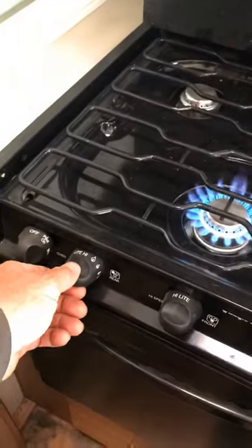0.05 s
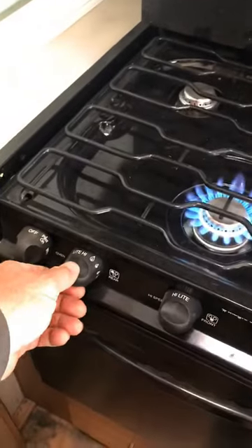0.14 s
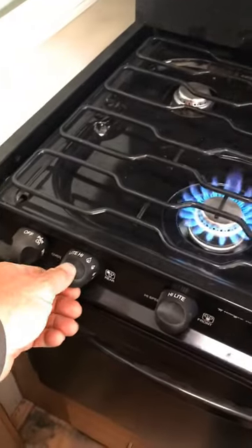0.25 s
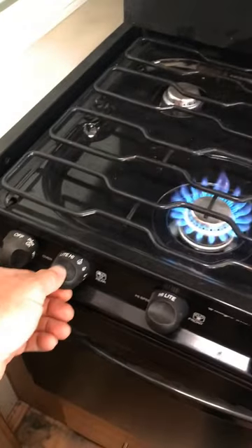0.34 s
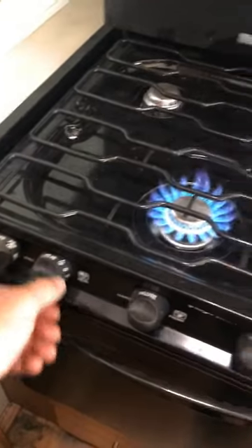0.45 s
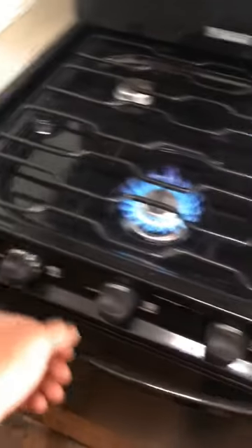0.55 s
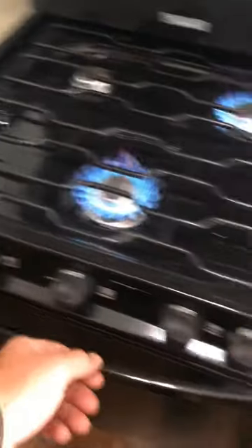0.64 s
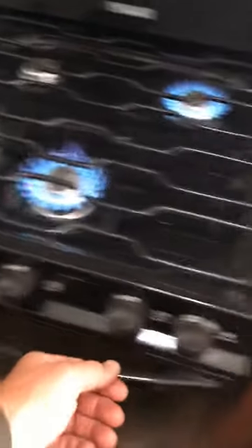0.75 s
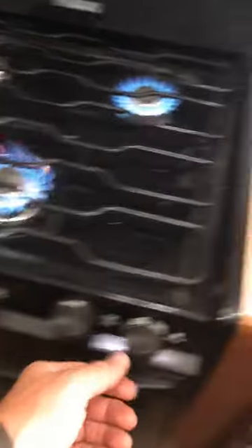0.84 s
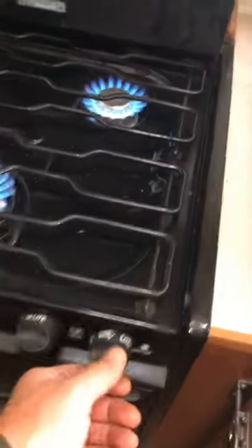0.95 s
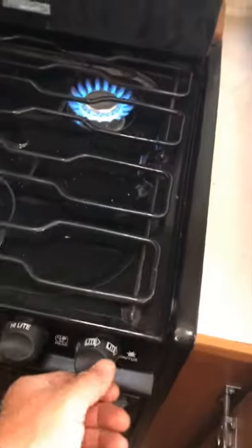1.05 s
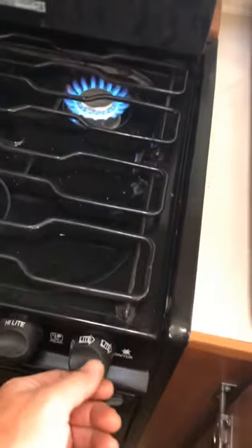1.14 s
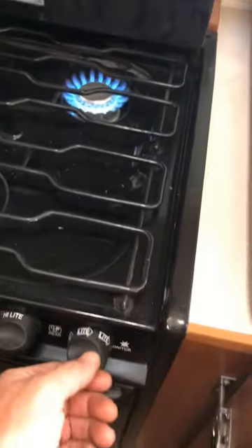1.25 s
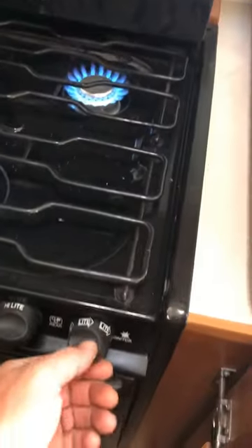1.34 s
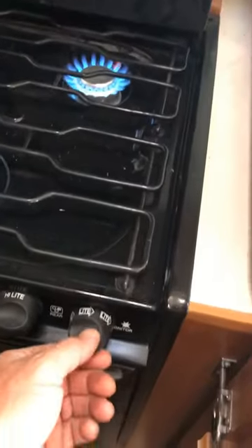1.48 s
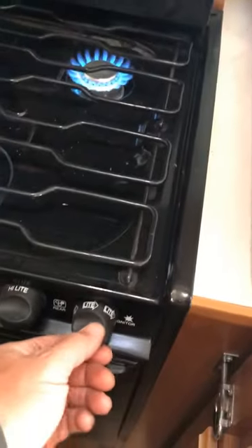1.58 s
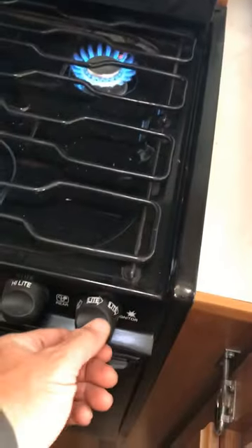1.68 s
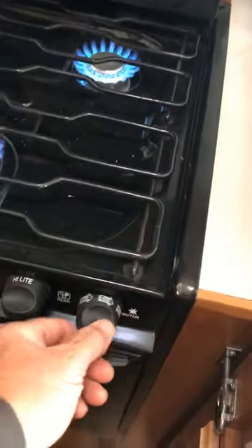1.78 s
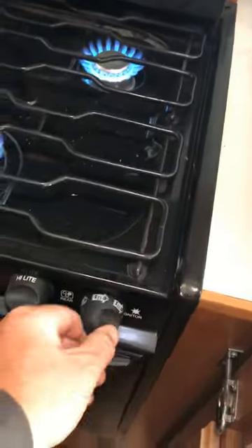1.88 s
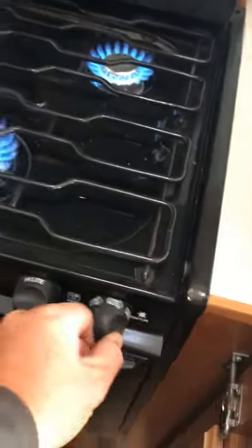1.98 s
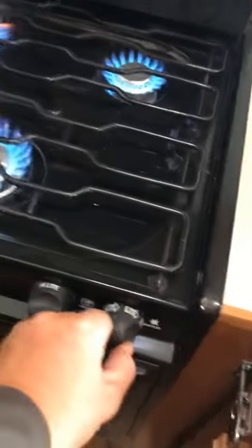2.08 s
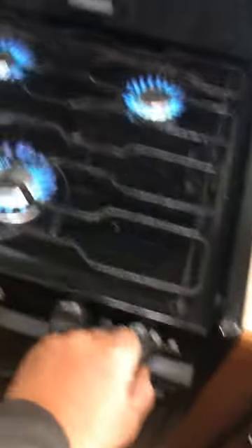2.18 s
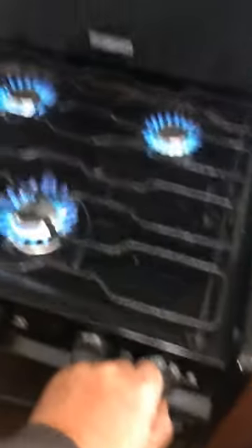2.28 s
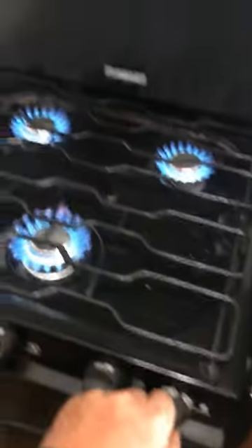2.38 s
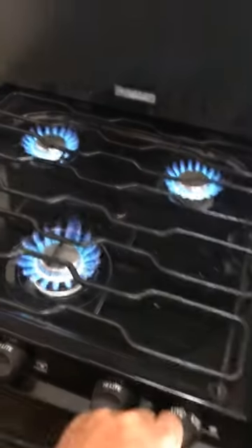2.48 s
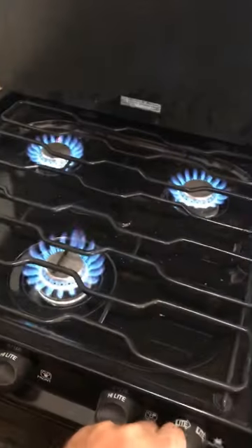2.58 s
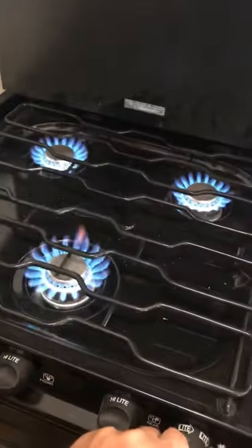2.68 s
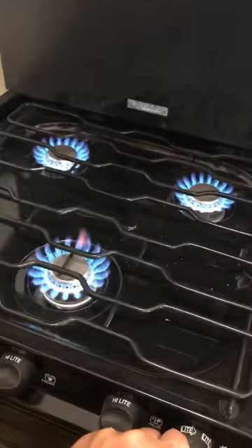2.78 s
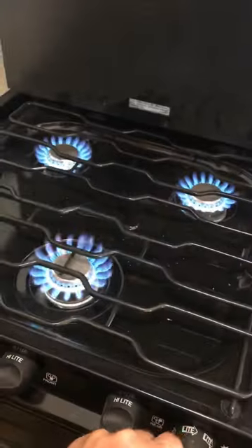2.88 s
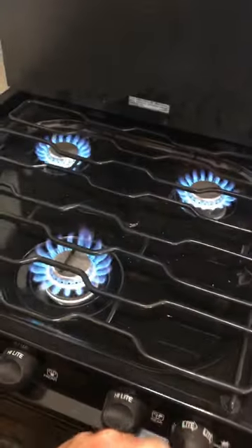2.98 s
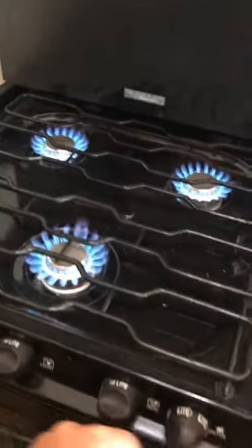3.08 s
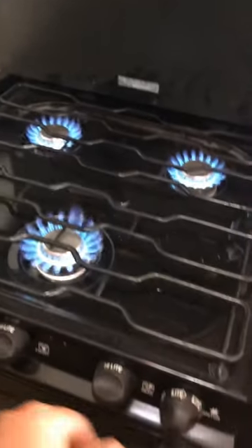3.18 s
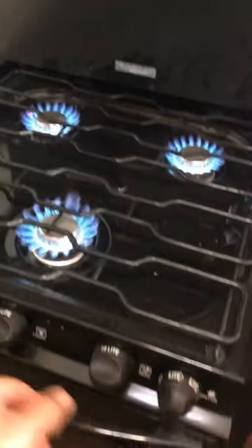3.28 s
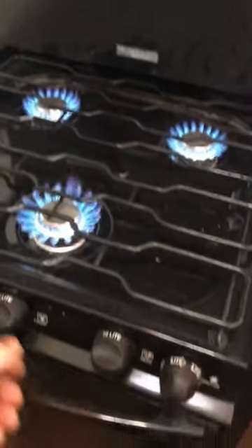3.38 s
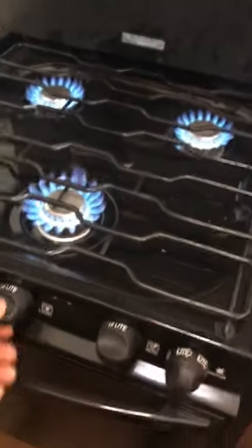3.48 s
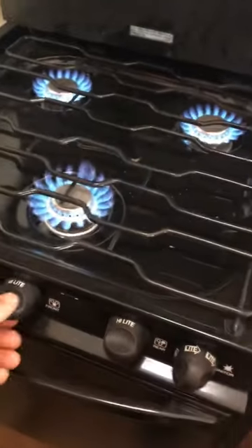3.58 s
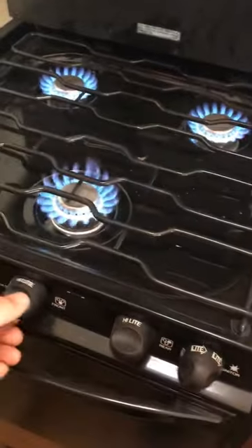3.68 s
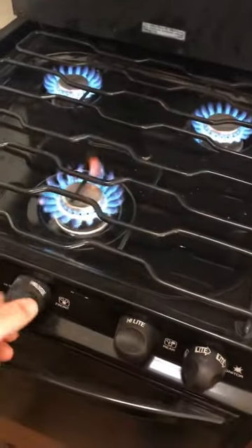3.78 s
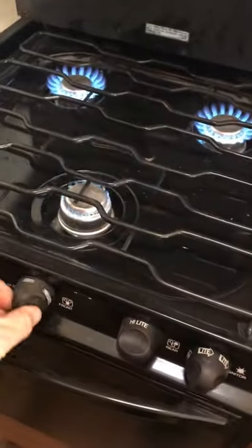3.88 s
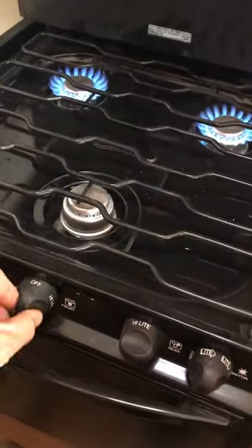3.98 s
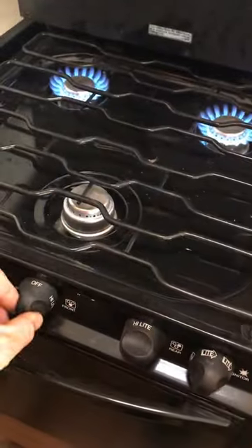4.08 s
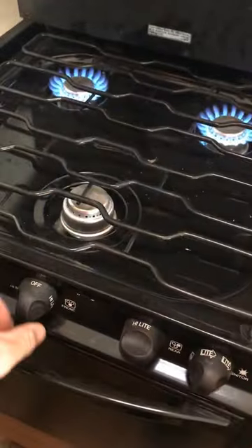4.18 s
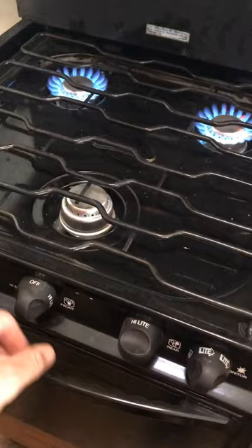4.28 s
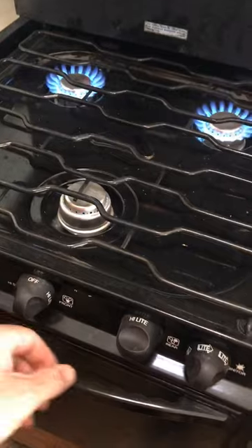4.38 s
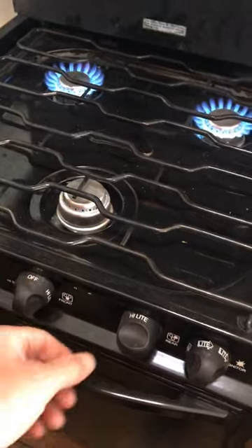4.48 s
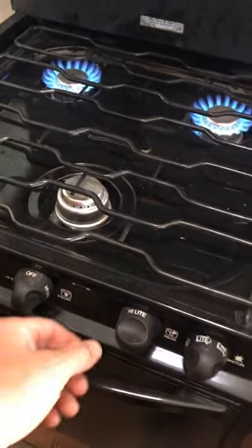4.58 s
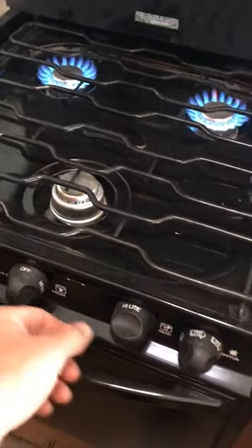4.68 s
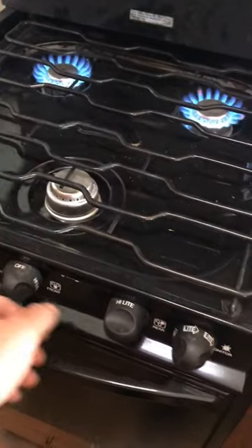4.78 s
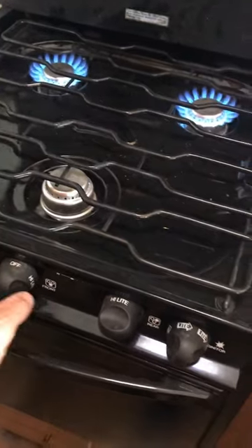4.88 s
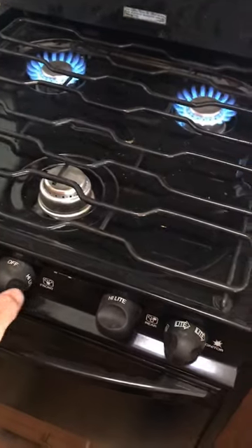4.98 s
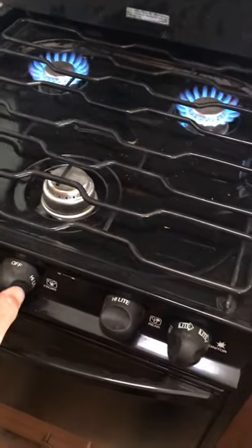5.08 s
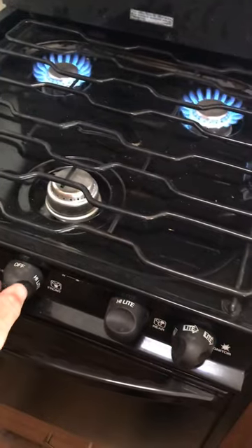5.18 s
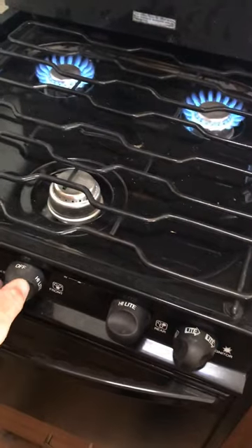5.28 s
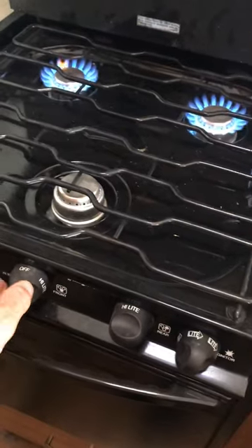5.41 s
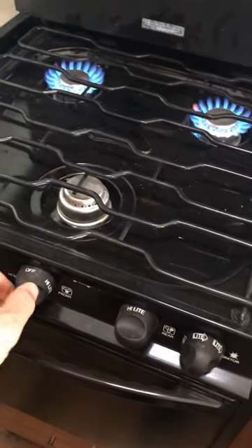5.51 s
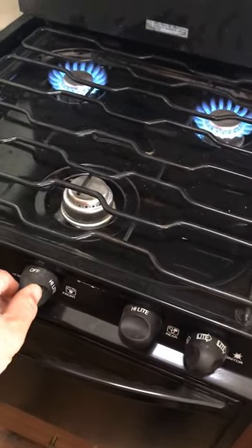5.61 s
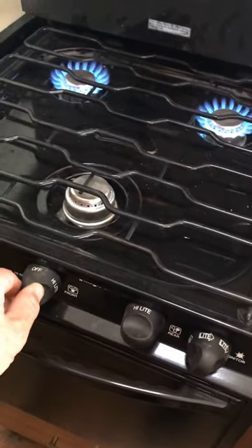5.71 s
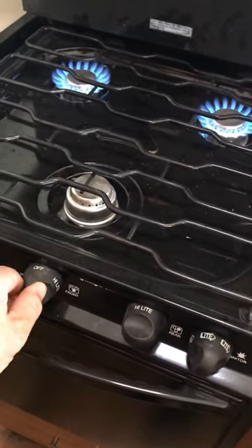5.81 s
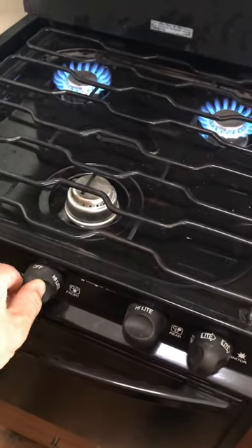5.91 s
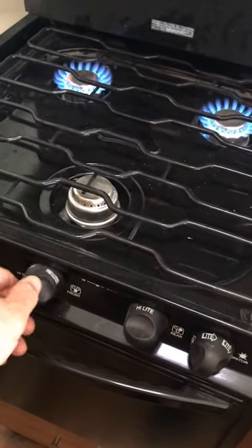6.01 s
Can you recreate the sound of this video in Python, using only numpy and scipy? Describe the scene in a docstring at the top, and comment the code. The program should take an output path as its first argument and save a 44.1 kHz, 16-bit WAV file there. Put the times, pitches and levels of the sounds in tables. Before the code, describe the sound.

A gas range murmurs and hisses softly as fingers tick its knobs, two loud igniter snaps clang through the metal, then a burner clicks off.

```python
"""Gas range, close up

Recorded in a kitchen with one microphone above a small range: filtered noise makes the burners' murmur,
hiss and faint whistle. Fingers rub and tick the knobs, and one burner is shut off with a sharp click.
A hand turns the rotary spark igniter: its shaft grinds, and its spring hammer snaps twice. Noise and
decaying modes ring the sheet-steel top, the wire grate and the spring; a burner catches with a soft puff."""
import sys
import numpy as np
from scipy import signal
from scipy.fft import rfft, irfft, next_fast_len
from scipy.io import wavfile
from scipy.ndimage import uniform_filter1d, minimum_filter1d, map_coordinates

SR = 44100
rng = np.random.default_rng(int(sys.argv[2]) if len(sys.argv) > 2 else 0)


def to_wav(s):
    """Save 16-bit WAV."""
    ch = np.atleast_2d(s).T  # columns
    pcm = np.round(np.clip(ch, -1, 1) * 32767)  # PCM
    wavfile.write(sys.argv[1], SR, pcm.astype(np.int16))


N = 266805  # samples
TOP_HZ = 16100  # band limit of everything heard

# Flame murmur. Each row: frequency in Hz, relative level in dB per Hz.
MURMUR_SPECTRUM = [(18, -38), (30, -21.5), (46, -4), (75, -2), (107, 3), (150, -7.5), (200, -16),
                   (255, -27), (400, -33), (1000, -45.5), (2200, -89.5)]
# Gas hiss. Each row: frequency in Hz, relative level in dB per Hz.
HISS_SPECTRUM = [(400, -27.5), (800, -15), (1300, -10), (2000, -14.5), (4900, -17.5), (6500, -14),
                 (9500, -15), (10500, -17.5), (12000, -13), (16000, -12.5)]
# Burner mixing tubes. Each row: frequency in Hz, width in Hz, relative level in dB.
TUBE_RESONANCES = [(548.7, 24, 2.5), (1100.8, 44, -2.5), (1313, 97, -11), (1740, 65, -10.5),
                   (2300, 60, -18.5)]
# Gas jets. Each row: frequency in Hz, width in Hz, relative level in dB.
JET_RESONANCES = [(5580, 120, -6.5), (6506, 160, -4.5), (8100, 33, -11.5), (8850, 160, -3.5),
                  (9412, 92, 3.5)]
# The hollow under the top. Each row: frequency in Hz, width in Hz, relative level in dB.
CAVITY_RESONANCES = [(303, 25, 1), (332.4, 21, -9)]
REAR_OPENS_S, BIG_CLOSES_S, VALVE_TURN_S = 0.34, 3.84, 0.2  # middle of each turn; length of a turn
MURMUR_DB, CAVITY_DB, HISS_DB, JETS_DB = -52, -72, -67, -72  # with the big burner closed
BIG_MURMUR_DB, BIG_CAVITY_DB, BIG_HISS_DB = 2.5, 8, 1.6  # what the big burner adds while open
JETS_STARVED_DB = 4  # the other jets sing less while it takes their pressure
TUBES_DB, TUBES_SHUT_DB = -67, -4.5  # with the rear valve open; the change with it shut

# Swells of the big burner's whistle. Each row: top in seconds, half length in seconds.
SWELLS = [(.35, 0.54), (3.55, 0.39)]
# The whistle's pitches. Each row: frequency in Hz, width in Hz, relative level in dB.
WHISTLE_RESONANCES = [(2268, 18, 0.0), (4403, 91, -9.0)]
WHISTLE_DB, WHISTLE_SWELL_DB = -84.5, 7.5  # steady level; the rise in a swell

# Knobs click and knock as they are pushed in or let go.
# Each row: start in seconds, level in dB, centre in Hz, t60 in seconds, stem pitch in Hz.
KNOB_CLICKS = [(2.402, -58.5, 940, .4, 940), (3.5935, -47.5, 4740, 0.072, 5300),
               (5.151, -64, 2200, 0.044, 3700), (5.1667, -52, 2800, 0.049, 3700),
               (5.881, -62.5, 2460, 0.15, 3720)]
# Fingers rub over a knob.
# Each row: start in seconds, level in dB, rise in seconds, t60 in seconds, relative panel level in dB.
KNOB_RUBS = [(.335, -66.5, 0.014, 0.27, -6), (.905, -68, 0.009, 0.66, 0), (.966, -58, 0.01, 0.11, 3.5),
             (1.06, -77, 0.08, 0.32, 9), (1.712, -59.5, 0.028, .35, -4), (3.506, -67.5, .005, 0.26, -3),
             (4.08, -63.5, 0.032, 0.24, -1.5), (5.19, -72, .01, 0.92, -4), (5.96, -67.5, 0.049, 0.64, -12)]
# Knob and stem. Each row: frequency in Hz, width in Hz, relative level in dB.
KNOB_RESONANCES = [(560, 120, -12), (1380, 300, 0), (2640, 280, -2.5), (3680, 230, -3), (5640, 803, -6),
                   (9500, 1500, -9.5)]
# Front panel under the fingers. Each row: frequency in Hz, relative level in dB per Hz.
FRONT_PANEL_SPECTRUM = [(100, 0.0), (500, -2), (1500, -5.0), (4000, -14.0), (12000, -35.5)]
CLICK_RISE_S, STEM_DB = 0.001, 5.5  # rise of every click; stem ring relative to its click
# The panel's level under a click centred at THUD_AT_HZ; duller clicks shake it more.
THUD_DB, THUD_DB_PER_OCTAVE, THUD_AT_HZ = 0, 10.5, 2520
RUB_HZ = 2806  # centre of every rub

# Crack of the shut-off. Each row: frequency in Hz, relative level in dB per Hz.
CRACK_SPECTRUM = [(150, -36.5), (550, -30), (1000, -39), (1400, -25), (1800, -19), (2650, -4), (3600, -7),
                  (5000, -8.5), (6100, -5), (7400, -9.5), (9000, 3), (10800, -10), (13400, 0.5),
                  (16000, -3)]
# Valve body. Each row: frequency in Hz, relative level in dB, t60 in seconds.
VALVE_MODES = [(1343, -11.5, 0.11), (2540, -7, 0.08), (2760, -14, 0.16), (3590, -2, 0.053),
               (3680, -13.5, 0.16), (6300, -8, 0.054), (8530, 4, 0.035), (8640, 4, 0.052), (9600, -10, .13),
               (13500, 3, 0.046)]
# The kitchen's answer. Each row: frequency in Hz, relative level in dB per Hz.
WALL_SPECTRUM = [(100, -33), (350, 11), (600, 11.0), (900, -3), (1400, 9.5), (2000, 1.5), (15000, -10)]

# The igniter's shaft under load. Each row: peak in seconds, level in dB, rise in seconds.
SHAFT_GRINDS = [(0.994, -52, 0.0092), (1.65, -58.5, 0.047), (1.815, -50.5, 0.031), (2.11, -40, 0.056)]
# Colour of the grinding. Each row: frequency in Hz, relative level in dB per Hz.
GRIND_SPECTRUM = [(80, -12), (200, 0), (550, -1.5), (900, -10), (1800, -11), (5000, -31.5), (12000, -65)]
GRIND_T60 = 0.18  # seconds

# Puff of the new flame. Each row: frequency in Hz, relative level in dB per Hz.
PUFF_SPECTRUM = [(30, -18.5), (70, -5), (115, 2), (200, -13.5), (400, -21.5), (900, -30), (4000, -67.5)]
CATCH_DELAY_S = 0.046  # from the first snap until the gas catches
PUFF_DB, PUFF_RISE_S, PUFF_HOLD_S, PUFF_T60 = -38.5, 0.034, .21, .17

# Igniter snaps. Each row: start in seconds, blow in dB, long ring in dB, spring buzz in dB,
# seconds for which the spring buzzes freely.
IGNITER_SNAPS = [(1.832, -8.5, -22.5, -39, .05), (2.125, -9.5, -21, -25, 0.27)]
# The cam's trip. Each row: frequency in Hz, relative level in dB per Hz.
TRIP_SPECTRUM = [(400, -30), (1500, 0.5), (3500, -0.5), (6000, -12.5), (16000, -19.5)]
# Clang of the steel top. Each row: frequency in Hz, relative level in dB per Hz.
CLANG_SPECTRUM = [(50, -25), (110, -8), (170, -3.5), (245, -15.5), (300, -6), (370, -14.5), (560, -5),
                  (720, -16.5), (1000, -18), (1400, -5), (2600, -5), (4500, -8.5), (9300, -9.5),
                  (10500, -14.5), (13500, -11), (16000, -13)]
# Decay of the clang. Each row: frequency in Hz, t60 in seconds.
CLANG_DECAY = [(120, 0.33), (500, 0.4), (1500, 0.25), (3000, 0.19), (7000, 0.15), (14000, 0.135)]
# Panel resonances.
# Each row: frequency in Hz, width in Hz, relative level in dB in the first snap, then in the second.
PANEL_RESONANCES = [(429, 7.9, -10, -12), (544, 24, -4.5, -4.5), (580, 24, -6, -6), (779.3, 16, -6, -4),
                    (1315, 16, -5, 0), (1420, 15, -6, -7.5), (1550, 30, 1, 1), (1761, 16, 3, -3.5),
                    (1842, 31, 1, 3), (1906, 32, -1, -1), (2124, 19, 0.5, 1.5), (2365, 26, 4.5, -1),
                    (2530, 28, 0, 3), (2607, 22, 5, -2), (2724, 25, -4, 2.5), (2972, 36, 3, -4),
                    (3160, 41, 1, 1), (3380, 28, -12.5, -1), (3765, 25, 3, -6.5), (4500, 25, 1, 3.5),
                    (6270, 28, -7, 5), (8300, 55, -0.5, 4), (9012, 67, 7, -4.5)]
# Lingering modes of the top. Each row: frequency in Hz, relative level in dB per Hz.
SHEET_SPECTRUM = [(200, -15), (450, -2), (950, -5), (1500, -1.5), (2700, -6), (4500, -9), (5500, -24),
                  (10000, -50)]
# Wire grate. Each row: frequency in Hz, relative level in dB, t60 in seconds.
GRATE_MODES = [(412, -10, 0.75), (547, -7, 0.58), (574, -6, .55), (771, -9.5, 0.75), (1315, -15.5, .6),
               (1583, -14, .55), (2024, -14.5, .45), (2135, -14, 0.65), (2175, -19.5, .8), (2375, -12, .59),
               (2470, -17.5, .6), (2665, -9.5, 0.4), (2751, -15, .55), (2970, -13, .4), (3085, -23, 0.9),
               (3946, -26.5, 1.3), (1790, -29.5, 2.5), (2546, -14.5, 1.2), (1437, -10, .62)]
# Spring buzz. Each row: frequency in Hz, relative level in dB per Hz.
SPRING_SPECTRUM = [(200, -35.5), (500, -18), (1000, -18.5), (1600, -5), (2100, -21.5), (2700, -2.5),
                   (3300, -12), (4300, -10.5), (5200, -14), (6500, -10.5), (7900, -15), (8800, -19),
                   (11500, -19), (13200, -13.5), (16000, -20.5)]
# The spring's strongest modes. Each row: frequency in Hz, relative level in dB, t60 in seconds.
COIL_MODES = [(3628, -2, 0.23), (4180, -2, 0.17), (4740, -11, 0.4), (6212, 0, 0.33), (6713, -17, 1),
              (7804, -8, 0.27), (9701, -2, 0.22), (10700, -9, 0.25), (10870, -17.5, 0.82),
              (12310, -12, 0.31), (12940, -10, 0.33), (13470, -10, 0.35)]
# The spring's coils touch: mean rate, relative level; depth of its modes' swell and sink.
CHATTER_PER_S, CHATTER_DB, TRADE_DB = 350, -5.5, 2.5
GRIP_LEAD_S, GRIP_T60 = 0.05, 0.23  # how much sooner the cam stills the highest modes; decay once gripped
# A loose wire of the shaken grate: its start, pitch, level and ring time in seconds.
WIRE_S, WIRE_HZ, WIRE_DB, WIRE_T60 = 2.247, 1610, -34.5, 0.72


def amp(db):
    """Decibels to gain."""
    return 10 ** (np.asarray(db) / 20)


def unit(x):
    """x scaled to rms 1."""
    return x / np.sqrt(np.mean(x ** 2) + 1e-20)


def along(points, hz):
    """(Hz, value) points read on a log axis."""
    f, v = np.transpose(points)
    return np.interp(np.log(hz + 1), np.log(f), v)


def fade(t, t60):
    """Exponential decay of 60 dB in t60."""
    return np.exp(-np.log(1000) * t / t60)


def build_up(t, seconds):
    """Exponential approach from 0 to 1."""
    return 1 - np.exp(-t / seconds)


def filtered(x, response):
    """x times a response of frequency."""
    m = next_fast_len(len(x) + SR // 4)
    return irfft(rfft(x, m) * response(np.fft.rfftfreq(m, 1 / SR)), m)[:len(x)]


def noise(response, size):
    """Coloured noise of rms 1."""
    return unit(filtered(rng.standard_normal(size), response))


def smooth(spectrum):
    """The response of (Hz, dB) points."""
    return lambda hz: amp(along(spectrum, hz))


def resonant(modes):
    """The response of (Hz, width, dB) resonances, their powers added."""
    def response(hz):
        power = sum((amp(db) * hz * width) ** 2 / ((centre ** 2 - hz ** 2) ** 2 + (hz * width) ** 2)
                    for centre, width, db in modes)
        return np.sqrt(power)
    return response


def ragged(response, depth_db, step_hz):
    """A response with the fine peaks and dips of a metal cavity."""
    knots = rng.standard_normal(2048)

    def rough(hz):
        ripple = map_coordinates(knots, [hz / step_hz], mode="wrap")
        return response(hz) * amp(depth_db * ripple)
    return rough


def partials(spectrum, size, count, scatter_db):
    """Many steady inharmonic modes of uneven strength, rms 1."""
    place, phase, strength = rng.random(count), rng.random(count), rng.standard_normal(count)
    hz = (np.arange(count) + place) * TOP_HZ / count
    level = amp(along(spectrum, hz) + scatter_db * strength)
    lines = np.zeros(size // 2 + 1, complex)
    lines[(hz * size / SR).astype(int)] = level * np.exp(2j * np.pi * phase)
    return unit(irfft(lines, size))


def ring(modes, t):
    """Damped (Hz, dB, t60) modes, struck at slightly new strengths each time."""
    return sum(amp(db + rng.standard_normal()) * fade(t, t60) * np.sin(2 * np.pi * (hz * t + rng.random()))
               for hz, db, t60 in modes)


def struck(resonances, t):
    """(Hz, width, dB) resonances after a blow: the wider, the sooner they die."""
    return ring([(hz, db, np.log(1000) / (np.pi * width)) for hz, width, db in resonances], t)


def add(track, s, sound):
    """Mix a sound into the track at time s."""
    room = track[round(s * SR):][:len(sound)]
    room += sound[:len(room)]


def turned(s):
    """How far a valve turned around time s has gone, 0-1 for each sample."""
    return np.clip(.5 + (np.arange(N) / SR - s) / VALVE_TURN_S, 0, 1)


def burners():
    """Flames murmur; gas hisses from jets and sounds the tubes and hollow; two valves set the levels."""
    big_open, rear_shut = 1 - turned(BIG_CLOSES_S), 1 - turned(REAR_OPENS_S)
    flames = amp(MURMUR_DB + BIG_MURMUR_DB * big_open) * noise(smooth(MURMUR_SPECTRUM), N)
    hollow = amp(CAVITY_DB + BIG_CAVITY_DB * big_open) * noise(resonant(CAVITY_RESONANCES), N)
    hiss_response = ragged(smooth(HISS_SPECTRUM), depth_db=0.4, step_hz=91.45)
    gas = amp(HISS_DB + BIG_HISS_DB * big_open) * noise(hiss_response, N)
    tubes = amp(TUBES_DB + TUBES_SHUT_DB * rear_shut) * noise(resonant(TUBE_RESONANCES), N)
    jets = amp(JETS_DB - JETS_STARVED_DB * big_open) * noise(resonant(JET_RESONANCES), N)
    return flames + hollow + gas + tubes + jets


def whistle():
    """Gas sings faintly at the rim of the big burner while it is open: noise in two narrow bands."""
    t = np.arange(N) / SR
    swell = sum(np.exp(-((t - s) / half) ** 2) for s, half in SWELLS)
    level = amp(WHISTLE_DB + WHISTLE_SWELL_DB * swell) * (1 - turned(BIG_CLOSES_S))
    return level * noise(resonant(WHISTLE_RESONANCES), N)


def contact(hz, centre_hz):
    """The band that a finger's contact excites."""
    return np.exp(-(np.log((hz + 1) / centre_hz) / 0.72) ** 2) + .07


def touch(t, centre_hz, rise, t60, thud_db):
    """Skin sticks and slips on a plastic knob; the front panel answers dully."""
    tick = noise(lambda hz: contact(hz, centre_hz) * (resonant(KNOB_RESONANCES)(hz) + 0.091), len(t))
    scuff = unit(amp(2 * noise(lambda hz: hz < 90, len(t))))  # slow uneven friction
    panel = noise(smooth(FRONT_PANEL_SPECTRUM), len(t))
    after = np.maximum(t - rise, 0)
    body = scuff * tick * fade(after, t60) + amp(thud_db) * panel * fade(after, 0.19)
    return np.minimum(t / rise, 1) * body


def knobs():
    """Fingers rub over the knobs and click them; only the sharp clicks ring a stem."""
    out, t = np.zeros(N), np.arange(SR // 2) / SR
    for s, db, centre_hz, t60, stem_hz in KNOB_CLICKS:
        thud_db = THUD_DB - THUD_DB_PER_OCTAVE * np.log2(centre_hz / THUD_AT_HZ)
        stem = amp(STEM_DB) * np.sin(2 * np.pi * stem_hz * t) * fade(t, 0.028)
        add(out, s, amp(db) * (touch(t, centre_hz, CLICK_RISE_S, t60, thud_db) + stem))
    for s, db, rise, t60, thud_db in KNOB_RUBS:
        add(out, s, amp(db) * touch(t, RUB_HZ, rise, t60, thud_db))
    return out


def shut_off():
    """A burner is closed: one bright crack, a short metal ring and the kitchen's answer."""
    out, t = np.zeros(N), np.arange(SR // 2) / SR
    two_decays = amp(-17.5) * fade(t, 0.039) + amp(-30.0) * fade(t, 0.14)
    crack = noise(smooth(CRACK_SPECTRUM), len(t)) * two_decays
    valve = amp(-30.0) * ring(VALVE_MODES, t)
    answer = noise(smooth(WALL_SPECTRUM), len(t)) * build_up(t, 0.0043) * fade(t, 0.31)
    add(out, 3.9203, crack + valve + amp(-41) * answer)
    return out


def grinding():
    """The shaft grinds dully in the front panel as the hand loads it, and stops as the load goes."""
    t = np.arange(N) / SR
    load = np.zeros(N)
    for s, db, rise in SHAFT_GRINDS:
        load += amp(db) * np.exp(np.minimum(t - s, 0) / rise) * fade(np.maximum(t - s, 0), GRIND_T60)
    return load * noise(smooth(GRIND_SPECTRUM), N)


def catching():
    """The gas lights after the first spark with a low puff: noise that swells, holds and dies."""
    out, t = np.zeros(N), np.arange(SR) / SR
    envelope = build_up(t, PUFF_RISE_S) * fade(np.maximum(t - PUFF_HOLD_S, 0), PUFF_T60)
    puff = noise(smooth(PUFF_SPECTRUM), len(t)) * envelope
    add(out, IGNITER_SNAPS[0][0] + CATCH_DELAY_S, amp(PUFF_DB) * puff)
    return out


def clang(t, spread_cycles, hold):
    """Dense bending waves in sheet steel: low ones build up slowly and, on the whole, last longer."""
    waves = noise(ragged(smooth(CLANG_SPECTRUM), depth_db=2.5, step_hz=59.4), len(t))
    hz, when, z = signal.stft(waves, SR, nperseg=128)
    build = 1 - np.exp(-((when + 0.002787) * (hz[:, None] + 300) / spread_cycles) ** 2)
    decay = fade(np.maximum(when - hold, 0), along(CLANG_DECAY, hz)[:, None])
    return signal.istft(z * build * decay, SR, nperseg=128)[1][:len(t)]


def spring(t, free):
    """The loose spring's modes trade energy, its coils chatter; the cam's grip stills high modes first."""
    touching = rng.random(len(t)) < CHATTER_PER_S / SR
    contacts = rng.standard_exponential(len(t)) ** 1.4 * touching
    tap = noise(smooth(SPRING_SPECTRUM), len(t)) * fade(t, 0.0054)
    chatter = unit(signal.fftconvolve(contacts, tap)[:len(t)])
    buzz = partials(SPRING_SPECTRUM, len(t), count=230, scatter_db=2.5) + amp(CHATTER_DB) * chatter
    waves = buzz * fade(t, 0.62) + ring(COIL_MODES, t)
    hz, when, z = signal.stft(waves, SR, nperseg=256)
    # slow random gains, alike in neighbouring bands
    drift = uniform_filter1d(rng.standard_normal(z.shape), size=3, axis=0)
    trade = amp(TRADE_DB * unit(uniform_filter1d(drift, size=7, axis=1)))
    gripped = free - GRIP_LEAD_S * hz[:, None] / TOP_HZ
    grip = fade(np.maximum(when - gripped, 0), GRIP_T60)
    return signal.istft(z * trade * grip, SR, nperseg=256)[1][:len(t)]


def igniter():
    """The cam trips, the hammer hits the crystal, the range rings; the spring buzzes until gripped again."""
    out, t = np.zeros(N), np.arange(2 * SR) / SR
    bloom = build_up(t, .012)
    for k, (s, blow_db, ring_db, spring_db, free) in enumerate(IGNITER_SNAPS):
        trip = noise(smooth(TRIP_SPECTRUM), len(t)) * fade(t, 0.074)
        add(out, s, amp(blow_db - 5.5) * trip)
        panel = struck([(hz, width, dbs[k]) for hz, width, *dbs in PANEL_RESONANCES], t)
        top = clang(t, spread_cycles=6, hold=0.012) + amp(-5.0) * bloom * panel
        sheet = partials(SHEET_SPECTRUM, len(t), count=300, scatter_db=2.5) * fade(t, 0.87)
        lingering = ring(GRATE_MODES, t) + amp(-13.5) * sheet
        after_ring = amp(ring_db) * lingering + amp(spring_db) * spring(t, free)
        add(out, s + .003, amp(blow_db) * top + bloom * after_ring)
    # a loose wire of the shaken grate pings once more
    ping = np.sin(2 * np.pi * WIRE_HZ * t) * fade(t, WIRE_T60) * build_up(t, 0.0055)
    add(out, WIRE_S, amp(WIRE_DB) * ping)
    return out


def scene():
    """Everything at one microphone above the range."""
    background = burners() + whistle()
    handling = knobs() + shut_off() + grinding()
    return (background + handling + catching() + igniter())[None]


def record(dry):
    """A limiter holds the snaps under full scale; a steep low-pass ends the sound at the band limit."""
    over_db = 20 * np.log10(np.maximum(np.abs(dry[0]) / .95, 1))
    recovery_db = 400 * np.arange(N) / SR  # the gain recovers at 400 dB per second
    cut_db = np.maximum.accumulate(over_db + recovery_db) - recovery_db
    gain = uniform_filter1d(minimum_filter1d(amp(-cut_db), size=33), size=33)
    return filtered(dry[0] * gain, lambda hz: 1 / (1 + (hz / TOP_HZ) ** 120))[None]


dry = scene()
out = record(dry)
to_wav(out)
```